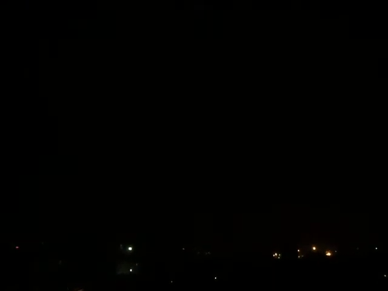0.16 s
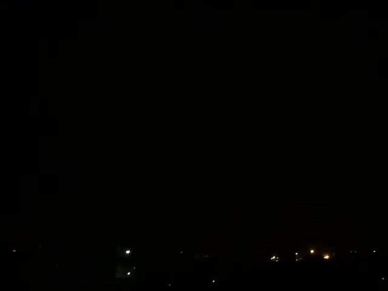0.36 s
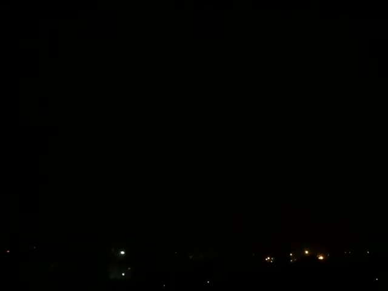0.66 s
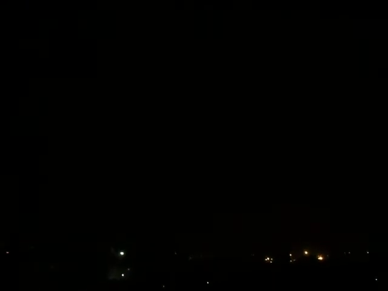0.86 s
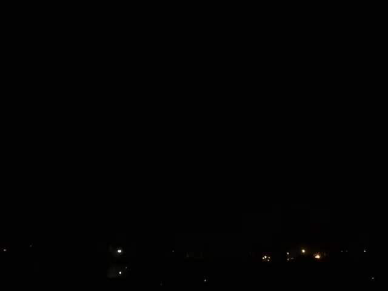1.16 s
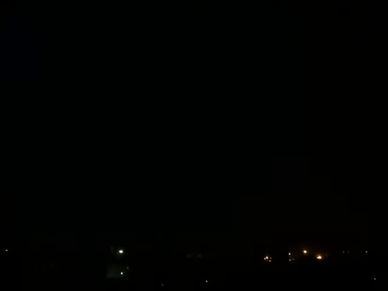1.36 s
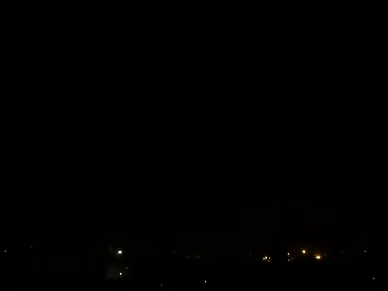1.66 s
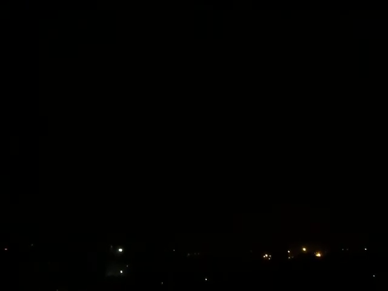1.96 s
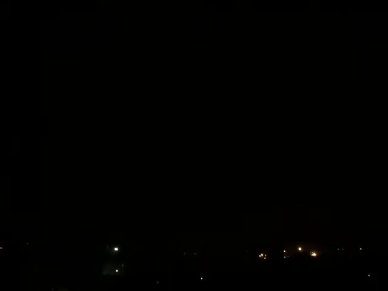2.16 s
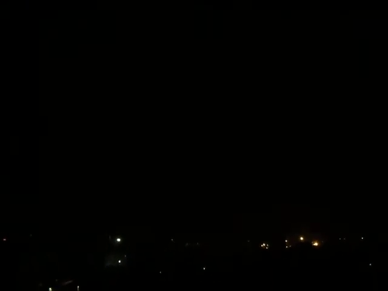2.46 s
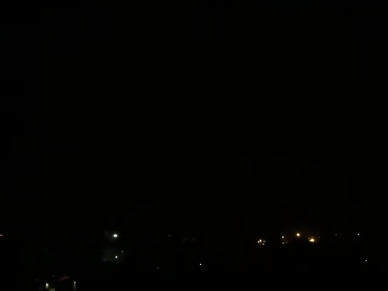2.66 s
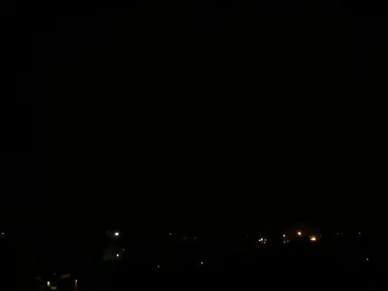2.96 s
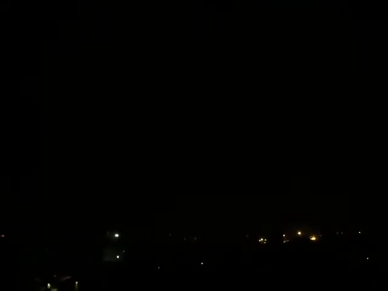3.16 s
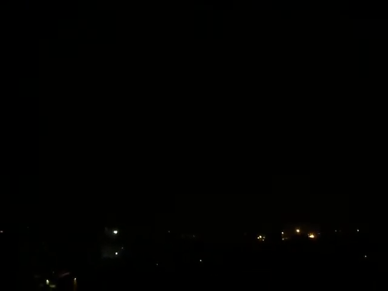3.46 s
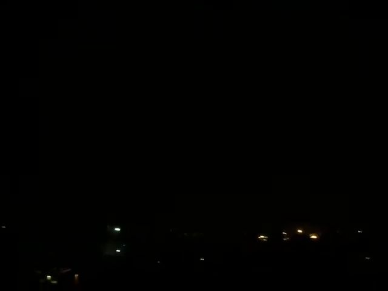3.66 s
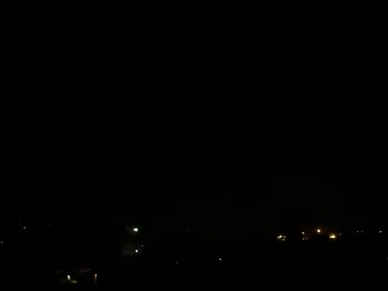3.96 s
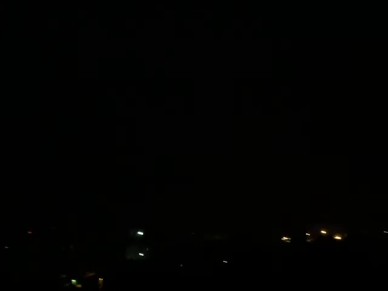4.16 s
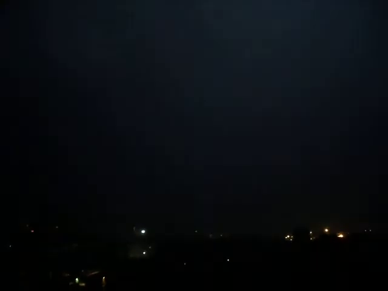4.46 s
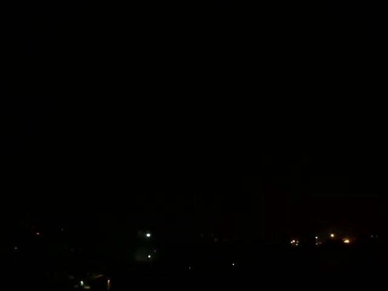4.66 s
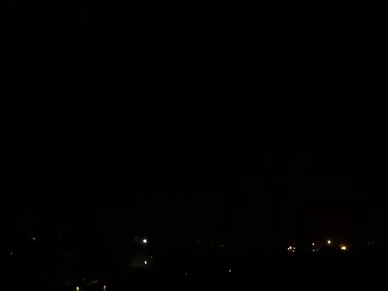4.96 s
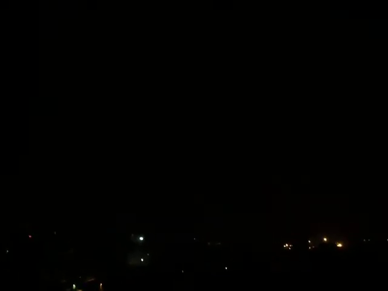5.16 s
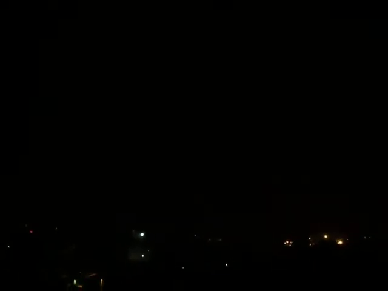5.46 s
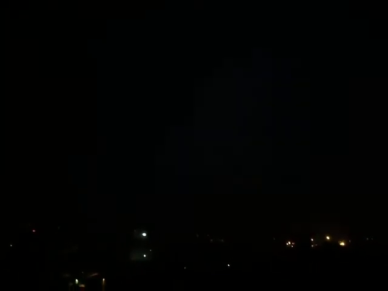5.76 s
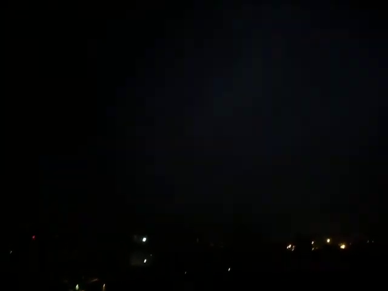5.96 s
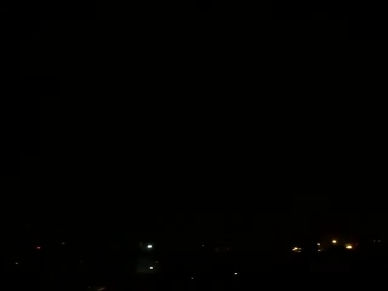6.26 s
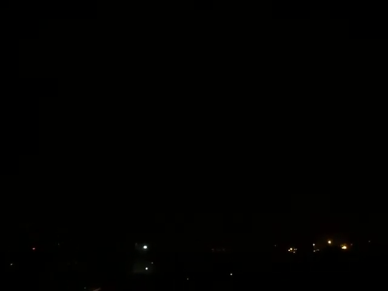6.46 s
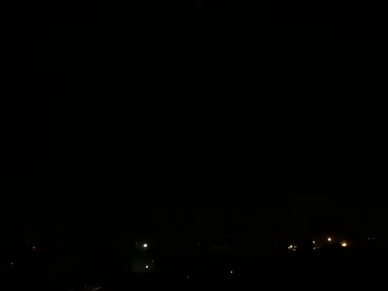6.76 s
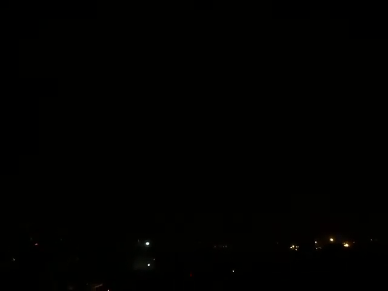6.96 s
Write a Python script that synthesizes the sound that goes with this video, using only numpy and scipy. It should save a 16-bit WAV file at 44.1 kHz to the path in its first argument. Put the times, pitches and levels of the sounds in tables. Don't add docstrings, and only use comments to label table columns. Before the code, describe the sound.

Night rain heard from a covered balcony above a dark town. From 0 to 1.4 s an even hiss on the ground, light patter on the wet ledge and scattered close drops lie over a faint, low rumble. At about 1.5 s thunder breaks out: rough cracks and heavy thuds at 1.5-1.6 s, the hardest clap near 1.8 s, another boom at 2.0 s. It eases around 2.5-2.9 s, then deep claps and rolling waves return from 3.0 to 3.7 s, dip near 4 s, and swell again as a muffled, farther roll around 4.6-4.8 s. Afterward it sinks into an uneven low grumble through 7 s, with a soft thump near 6.1 s. Drops splash close at 4.4 and 4.95 s, the latter with a low knock; a quick cluster of bright, metallic railing snaps comes at 6.1 s. Rain slowly thickens, with small flurries throughout.

```python
import sys
import numpy as np
from scipy import signal
from scipy.fft import rfft, irfft, next_fast_len
from scipy.io import wavfile
from scipy.ndimage import uniform_filter1d, map_coordinates

SR = 44100
rng = np.random.default_rng(int(sys.argv[2]) if len(sys.argv) > 2 else 0)


def to_wav(s):
    ch = np.atleast_2d(s).T
    pcm = np.round(np.clip(ch, -1, 1) * 32767)
    wavfile.write(sys.argv[1], SR, pcm.astype(np.int16))


N = 312889


def amp(db):
    return 10 ** (np.asarray(db) / 20)


def unit(x):
    return x / np.sqrt(np.mean(x ** 2) + 1e-20)


def smooth_twice(x, size, axis=-1):
    return uniform_filter1d(uniform_filter1d(x, size, axis=axis), size, axis=axis)


def wobble(rate):
    knots = rng.standard_normal(int(N * rate / SR) + 4)
    return map_coordinates(knots, [np.arange(N) * rate / SR])


def filtered(x, gain_db):
    m = next_fast_len(N + 8192)
    gain = amp(gain_db(np.fft.rfftfreq(m, 1 / SR)))
    return irfft(rfft(x, m) * gain, m)[..., :N]


def along(points):
    hz, db = np.transpose(points)
    return lambda f: np.interp(np.log(f + 1), np.log(hz + 1), db)


def coloured(x, spectrum):
    return unit(filtered(x, along(spectrum)))


def shocks(rate, spread_db):
    hit, size, sign = rng.random((3, N))
    kick = amp(-spread_db * np.log(size + 0.055)) * np.sign(sign - .5)
    return unit((hit < rate / SR) * kick)


def steadied(x, span_s, share):
    power = np.abs(smooth_twice(unit(x) ** 2, int(span_s * SR)))
    return unit(x / (power + .05) ** (share / 2))


# centre in seconds, lift in dB, half length in seconds.
GUSTS = [(.06, 0, 0.027), (0.22, 6, .035), (.6, 2.5, 0.044), (1.443, 4, 0.04), (1.664, 1.5, .04),
         (2.94, 2, 0.025), (3.042, 3, .03), (3.174, 1, .03), (3.71, 2, 0.024), (3.89, 3, 0.033),
         (5.498, 2, 0.085), (5.98, 1, 0.2), (6.15, 5, 0.055), (6.46, 0, .05), (6.65, 0, .06),
         (6.9, 4, 0.049)]
CALM_DB, THICKENS_DB_PER_S = -1.5, 0.48


def flurries():
    t = np.arange(N) / SR
    gusts = sum(db * np.exp(-((t - s) / half) ** 2) for s, db, half in GUSTS)
    return CALM_DB + THICKENS_DB_PER_S * t + 0.56 * wobble(12) + gusts


# frequency in Hz, level in dB per Hz.
GROUND_RAIN = [(150, -36), (400, -13), (950, -1), (1600, -3.5), (2560, -8.5), (3520, -10.5), (6000, -16.5),
               (9450, -19), (20000, -23.5)]
# frequency in Hz, level in dB per Hz.
LEDGE_RAIN = [(900, -43), (2000, -1), (3600, 0), (5500, -6), (9000, -14), (20000, -29)]


def rain():
    z = signal.stft(rng.standard_normal(N), nperseg=256)[2]
    patches = uniform_filter1d(rng.standard_normal(z.shape), size=18, axis=0)
    patches = unit(uniform_filter1d(patches, size=8, axis=1))
    hiss = signal.istft(z * amp(0.95 * patches), nperseg=256)[1][:N]
    flurry_db = flurries()
    capped_flurry_db = np.minimum(flurry_db, 2.6)
    flurry_db = capped_flurry_db
    far = amp(-62.5 + 0.36 * capped_flurry_db + 0.44 * wobble(25)) * coloured(hiss, GROUND_RAIN)
    patter = shocks(3000, spread_db=0.0) + 0.65 * rng.standard_normal(N)
    return far + amp(-71.5 + 1.44 * flurry_db) * coloured(patter, LEDGE_RAIN)


# time in seconds, level in dB, centre in Hz.
HARD_TAPS = [(.048, -65.5, 6500), (.174, -63, 3300), (.21, -74, 6700), (.426, -64, 1270), (.607, -62, 2900),
             (.721, -59.5, 1300), (.753, -70, 4800), (.799, -65, 3300), (.815, -66, 4700),
             (1.641, -58.5, 2600), (1.877, -65, 3600), (2.144, -62, 2180), (2.204, -63.5, 4100),
             (2.722, -74, 9000), (3.174, -59.5, 3120), (3.321, -63.5, 3780), (3.585, -74, 7800),
             (3.615, -65, 3100), (3.884, -61, 3600), (4.085, -72, 8600), (4.933, -64.5, 3600),
             (4.957, -51.5, 1500), (4.986, -60, 2100), (5.069, -67, 4300), (5.527, -63, 3400),
             (5.559, -63.5, 2800), (5.561, -73, 6900), (6.981, -69, 3400), (7.059, -64, 4130),
             (7.077, -64, 5500)]
# time in seconds, level in dB, centre in Hz.
PUDDLE_BURSTS = [(.222, -75, 6900), (.232, -65, 4100), (.33, -66, 985), (.617, -64, 4000),
                 (.969, -70, 5700), (1.212, -64, 1300), (1.426, -66.5, 3600), (1.452, -64, 3300),
                 (1.676, -69, 3600), (2.175, -76, 6700), (2.475, -70, 4500), (2.708, -72, 9000),
                 (2.936, -73.5, 7500), (3.031, -71, 5000), (3.047, -69, 4470), (3.632, -69, 4500),
                 (3.718, -68, 6500), (4.073, -67, 4500), (4.358, -60, 1200), (4.373, -56.5, 1460),
                 (4.376, -68, 8000), (4.92, -61, 1290), (6.038, -60.5, 2820), (6.052, -73, 5700),
                 (6.078, -69, 7500), (6.192, -62.5, 2180), (6.459, -66, 4100), (6.641, -63.5, 2200),
                 (6.887, -63, 2100), (6.898, -65, 5300)]
TAP_S, TAP_HZ = 0.0062, 580
BURST_S, BURST_HZ = 0.013, 650
WIDENS = 0.35


def splashes():
    out, t = np.zeros(N + 4096), np.arange(-2048, 2048) / SR
    hz = np.fft.rfftfreq(len(t), 1 / SR)
    drops = [(*row, TAP_HZ, TAP_S) for row in HARD_TAPS]
    drops += [(*row, BURST_HZ, BURST_S) for row in PUDDLE_BURSTS]
    for s, db, centre_hz, width_hz, length in drops:
        width_hz = width_hz * (centre_hz / 1000) ** WIDENS
        band = np.exp(-((hz - centre_hz) / (0.57 * width_hz)) ** 2)
        broad = np.exp(-(np.log(hz / centre_hz + 1e-9) / 0.49) ** 2)
        puff, spray = irfft(rfft(rng.standard_normal((2, len(t)))) * [band, broad])
        puff = puff * np.exp(-(t / (length * np.where(t < 0, .55, .8))) ** 2)
        splash = puff + 0.32 * spray * np.exp(-(t / (0.0044 + 1.6 * length)) ** 2)
        level = amp(db + 2) * np.sqrt(length * SR / np.sum(splash ** 2))
        out[round(s * SR):][:len(t)] += level * splash
    return out[len(t) // 2:][:N]


# time of the trough in seconds, level in dB, pitch in Hz.
STRONG_SHOCKS = [(.0727, -41, 138), (1.4625, -35, 500), (1.4885, -29, 500), (1.5076, -22, 220),
                 (1.5733, -20, 206), (1.754, -32, 520), (1.7745, -28, 520), (1.7749, -17.5, 171),
                 (2.041, -23, 162), (2.422, -38, 520), (2.4258, -28, 125), (2.959, -38, 520),
                 (2.9814, -27, 118), (3.1066, -24, 137), (3.3045, -22, 144), (3.4022, -21, 151),
                 (4.1216, -28, 136), (4.443, -37, 520), (6.0697, -27, 135), (6.971, -33, 150)]


def claps():
    out, lull, t = np.zeros(N + 2048), np.ones(N + 2048), np.arange(-1024, 1024) / SR
    for s, db, hz in STRONG_SHOCKS:
        shape = np.exp(-(hz * t / np.where(t < 0, .75, .6)) ** 2)
        out[round(s * SR):][:len(t)] -= amp(db) * np.cos(2 * np.pi * hz * t) * shape
        lull[round(s * SR):][:len(t)] *= 1 - .85 * np.sqrt(shape)
    return out[len(t) // 2:][:N], lull[len(t) // 2:][:N]


# peak in seconds, level in dB, distance in km beyond the
# near parts, extra boom in dB.
BOLT_PARTS = [(0.15, -49.5, 4, -3), (0.62, -50, 2.7, -13), (0.741, -49.5, 1.62, -3),
              (0.925, -49, 2.5, -16.5), (1.134, -59, 0.4, 5), (1.507, -36, 0.2, -12.0),
              (1.593, -31.5, 0.4, -4.5), (1.669, -36, 3.5, -6), (1.78, -37, 0.55, -14),
              (1.853, -53.3, 0.06, 11.5), (2.02, -38, 0.0, 5.5), (2.499, -41, 2, -8.5),
              (2.64, -59, 1.5, 13.5), (2.88, -44, 1.79, -16), (2.999, -50.5, 1.1, 9.5),
              (3.267, -32.5, 5, -7), (3.337, -47.5, 1.5, 13), (3.55, -34, 2.5, -17.5),
              (3.708, -52.5, 0, 11.8), (3.867, -53, -0.3, 16.5), (4.122, -50, 0.13, -3),
              (4.392, -40.5, 1.9, -1), (4.633, -32.5, 2.5, -4), (4.843, -44, 0.53, 10.5),
              (5.15, -44.5, 0.9, 1.5), (5.435, -44.5, 1.41, -5.5), (5.901, -46, 0.6, -8.0),
              (6.07, -45, 2.3, -5), (6.518, -47.5, 2.5, -5.5), (7.028, -43.5, 2.1, -4.5)]
RISE_S, RISE_S_PER_KM = 0.019, 0.037
FALL_DB_PER_S, DRAG_PER_KM = 122, 2.9
AFTERGLOW_DB, AFTERGLOW_DB_PER_S = -19.5, 2
BOOM_DB, BODY_DB, CRACK_DB = 2.5, 2.5, -1.14
BODY_DB_PER_KM, CRACK_DB_PER_KM = 2.5, 6.5


def arrivals():
    s, db, km, depth_db = np.transpose(BOLT_PARTS)[:, :, None]
    t = np.arange(0, N + 128, 64) / SR
    late = np.maximum(t - s, 0)
    swell = np.exp(-(np.minimum(t - s, 0) / (RISE_S + RISE_S_PER_KM * km)) ** 2)
    fall = amp(-FALL_DB_PER_S * late / (1 + DRAG_PER_KM * km)) ** 2
    afterglow = amp(AFTERGLOW_DB - AFTERGLOW_DB_PER_S * late) ** 2
    power = swell * (fall + afterglow)

    def total_db(level_db):
        total = (amp(level_db) ** 2 * power).sum(axis=0)
        return np.interp(np.arange(N) / SR, t, 10 * np.log10(total))

    boom_db = total_db(db + BOOM_DB + depth_db)
    roll_db = total_db(db)
    body_db = total_db(db + BODY_DB - BODY_DB_PER_KM * km)
    crack_db = total_db(db + CRACK_DB - CRACK_DB_PER_KM * km)
    return boom_db, roll_db, body_db, crack_db


# centre in seconds, boom lift in dB,
# roll lift in dB, body and crack lift in dB.
WAVE_SURGES = [(.33, -0.5, 2.5, 5), (.49, -10, -2, -2.5), (.65, 3, -5, 3.5), (1.39, -9, -3.5, -1.5),
               (1.54, -9, -2, -2), (1.65, -4, 8.5, 1), (1.72, -0.5, -9, -3.5), (1.85, 1, 0, 0.5),
               (1.96, 1, -3, 0.5), (2.025, -3.5, -12, -1), (2.08, -0.5, -0.5, 1.5), (2.17, -7, 4, 2.5),
               (2.4, 0, -2, -4), (2.44, -1, 1.5, 3.5), (2.57, 4, 3, -0.5), (3.07, -7, -4, 1),
               (3.33, 4, -1, 0.5), (3.49, 3.5, -5.5, -0.5), (3.53, -7, 6, 1), (3.65, -8, 4.5, 0.5),
               (3.85, -1, -1, 2.5), (4.03, -7, -9.5, -0.5), (4.13, 3.5, 4, 0), (4.3, -3, -3, -1),
               (4.72, -6, 0.5, 1.5), (4.78, -3.5, -4, -2), (4.84, 2, 6.5, -0.5), (4.99, 2.5, -8.5, 0.5),
               (5.05, -2, 4, -2.5), (6.23, -11, -3, 1)]
SURGE_S = 0.033


def surges():
    t = np.arange(N) / SR
    return sum(np.outer(lift_db, np.exp(-((t - s) / SURGE_S) ** 2)) for s, *lift_db in WAVE_SURGES)


# frequency in Hz, level in dB per Hz.
DEEP_AIR = [(8, -39), (20, -3), (36, 3), (52, -7.5), (65, -3.5), (90, -77)]
BOOM_AIR = [(48, -63.5), (65, -12.5), (85, 3.5), (115, 2), (128, -3.5), (165, -69.5)]
ROLL_AIR = [(85, -66.5), (112, -11.5), (128, -0.5), (160, 2), (200, -6), (230, -14), (310, -76)]
BODY_AIR = [(165, -46.5), (215, -4), (250, -0.5), (300, -5), (370, -6.5), (450, -13), (520, -23),
            (700, -82)]
CRACK_AIR = [(330, -48.5), (450, -6), (520, -2), (700, -4), (1000, -14), (1500, -22.5), (2500, -43.5),
             (4000, -80)]
# frequency in Hz, level in dB per Hz.
TOWN_ECHO = [(330, -52.5), (450, -4), (520, -3), (700, -5), (1000, -10), (1500, -26), (4000, -63)]
# frequency in Hz, width in Hz, lift in dB.
BALCONY_MODES = [(36, 6.9, 8.5), (83.1, 8.6, 4.5), (103.2, 13.6, 2), (121, 5, 1.5), (144.2, 11.5, 4.5),
                 (197.7, 12, 5), (215.6, 11, 3), (264, 15, 3), (514.4, 19, 3.5), (571, 11, -3.5),
                 (578, 14, 6), (648, 30, 3.5)]
EARLIER_CRACK_DB = -63


def balcony(f):
    return sum(db / (1 + (2 * (f - hz) / width) ** 2) for hz, width, db in BALCONY_MODES)


def peal(lull):
    boom_db, roll_db, body_db, crack_db = arrivals()
    boom_lift, roll_lift, short_lift = surges()
    boom_db, roll_db = boom_db + boom_lift, roll_db + roll_lift
    body_db, crack_db = body_db + short_lift, crack_db + short_lift
    crack_db = 10 * np.log10(amp(crack_db) ** 2 + amp(EARLIER_CRACK_DB) ** 2)
    deep_db = uniform_filter1d(boom_db + roll_db, SR // 5) / 2 - 7 - 0.61 * np.arange(N) / SR

    kinks = shocks(900, spread_db=2.5)

    def scatter(share, air):
        return coloured(kinks + share * rng.standard_normal(N), air)

    deep = steadied(scatter(1.4, DEEP_AIR), span_s=.15, share=0.35)
    boom = steadied(scatter(1.54, BOOM_AIR), span_s=0.078, share=0.67)
    roll = steadied(scatter(2.2, ROLL_AIR), span_s=0.075, share=0.63)
    body = steadied(scatter(0.87, BODY_AIR), span_s=0.046, share=0.83)
    near = np.clip((crack_db + 55) / 7, 0, 1)
    crack = near * scatter(1.0, CRACK_AIR) + (1 - near) * scatter(1.33, TOWN_ECHO)
    crack = steadied(crack, span_s=0.037, share=0.51)

    deep = amp(deep_db) * deep
    boom = amp(boom_db - 1.03 + 1.6 * wobble(14)) * boom
    roll = amp(roll_db - 1.34 + 1.5 * wobble(15)) * roll
    body = amp(body_db + 0.46 + 0.81 * wobble(22)) * body
    crack = amp(crack_db - 0.43 + 0.8 * wobble(24)) * crack
    return amp(-2.0) * filtered(deep + lull * (boom + roll + body) + crack, balcony)


# time in seconds, first mode in Hz, level in dB of the first mode, of the #
# 5400 Hz mode and of the 9000 Hz mode.
RAIL_SNAPS = [
    (1.7098, 6300, -47, -59, -47),
    (4.37, 1450, -54, -72, -64),
    (4.957, 1520, -42, -70, -75),
    (6.084, 3600, -60, -56, -50),
    (6.0875, 3340, -39, -40, -38),
    (6.089, 6700, -42.5, -60, -50),
    (6.139, 4500, -43, -47, -52),
    (6.149, 2800, -43.5, -37, -38.5),
    (6.1497, 1800, -46.5, -70, -70),
]
# frequency in Hz, t60 in seconds.
RAIL_MODES = [(5400, 0.0032), (9000, 0.0041)]
FIRST_MODE_CYCLES = 28


def railing():
    out, t = np.zeros(N), np.arange(SR // 20) / SR
    for s, first_hz, *mode_db in RAIL_SNAPS:
        modes = zip(mode_db, [(first_hz, FIRST_MODE_CYCLES / first_hz), *RAIL_MODES])
        ring = sum(amp(db - 60 * t / t60) * np.sin(2 * np.pi * hz * t) for db, (hz, t60) in modes)
        tick = amp(mode_db[-1] - 0.5 - 60 * t / 0.0045) * rng.standard_normal(len(t))
        out[round(s * SR):][:len(t)] += (ring + tick) * (1 - np.exp(-t / 0.00011))
    return out


def scene():
    clap, lull = claps()
    return (rain() + splashes() + clap + peal(lull) + railing())[None]


# frequency in Hz, gain in dB.
MIC_RESPONSE = [(20, 0.5), (10100, 0.5), (10500, -4), (11050, -17), (11550, -15), (11950, -18),
                (12400, -32), (12600, -74), (22050, -68)]


def record(dry):
    return filtered(dry, along(MIC_RESPONSE))


dry = scene()
out = record(dry)
to_wav(out)
```